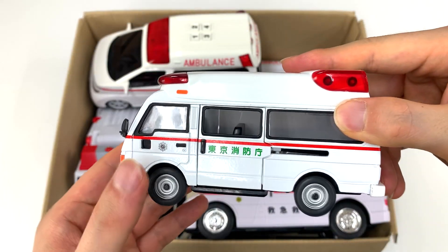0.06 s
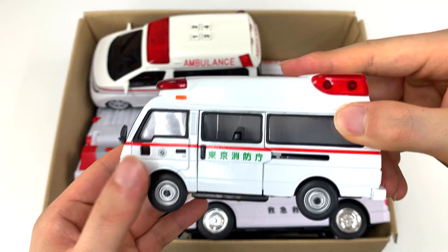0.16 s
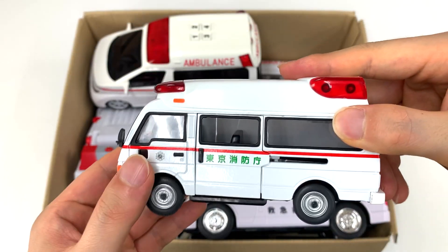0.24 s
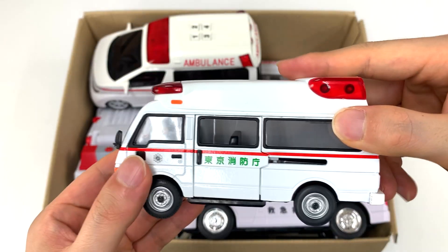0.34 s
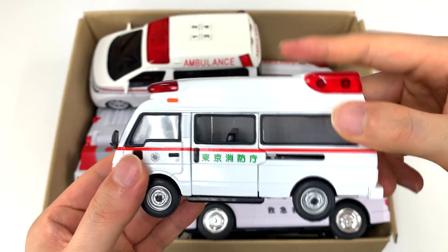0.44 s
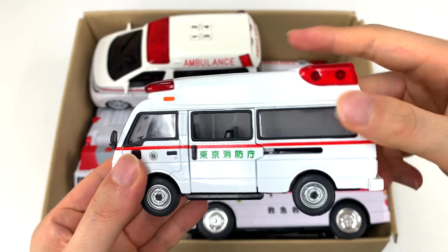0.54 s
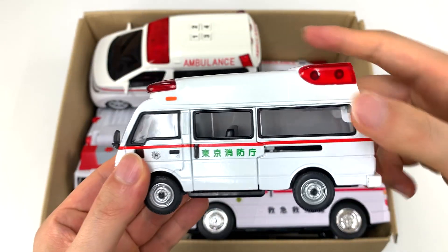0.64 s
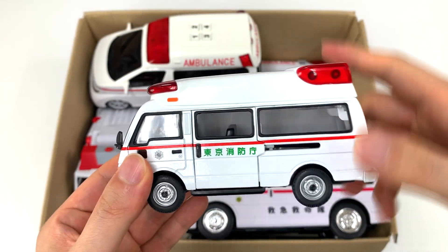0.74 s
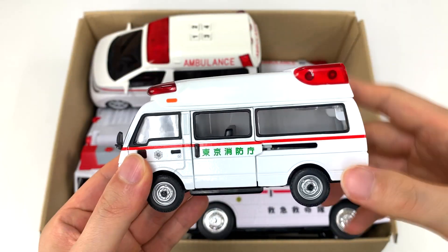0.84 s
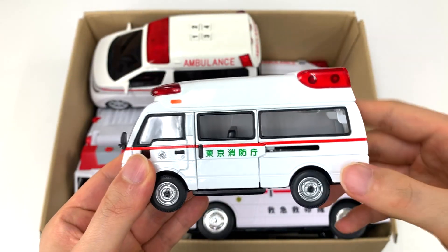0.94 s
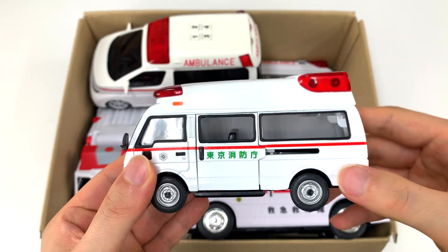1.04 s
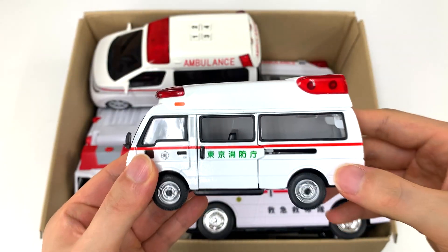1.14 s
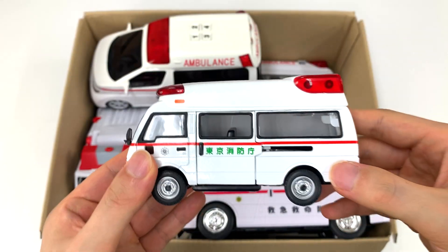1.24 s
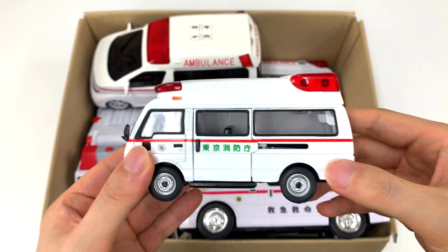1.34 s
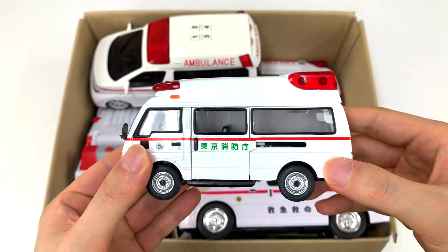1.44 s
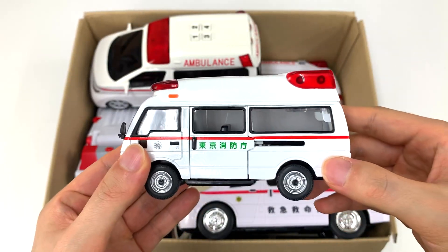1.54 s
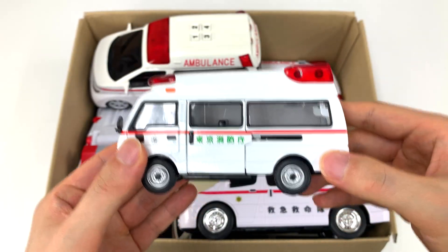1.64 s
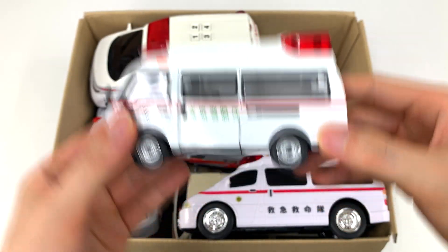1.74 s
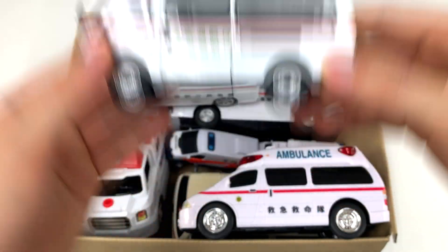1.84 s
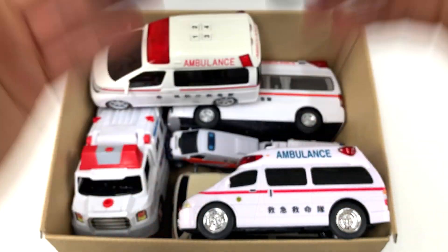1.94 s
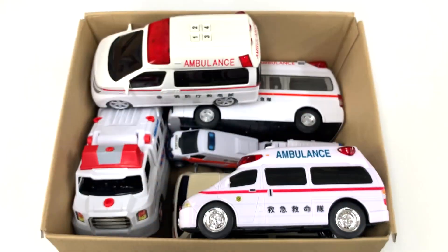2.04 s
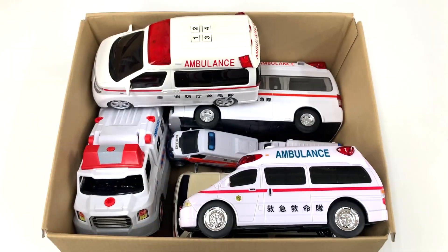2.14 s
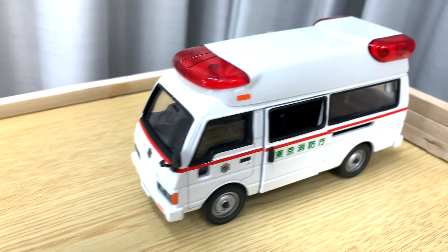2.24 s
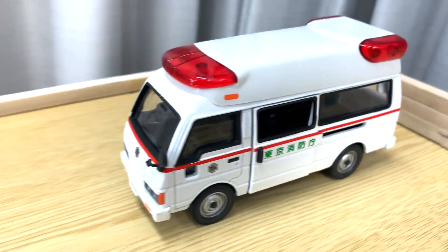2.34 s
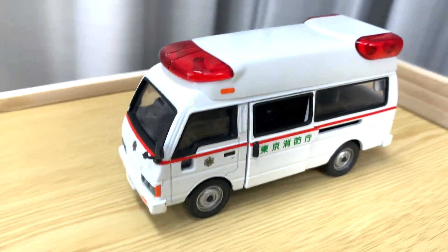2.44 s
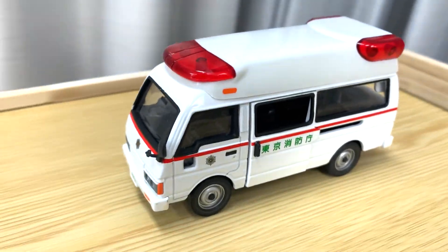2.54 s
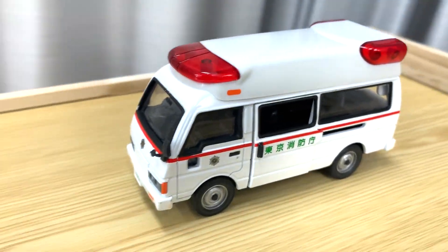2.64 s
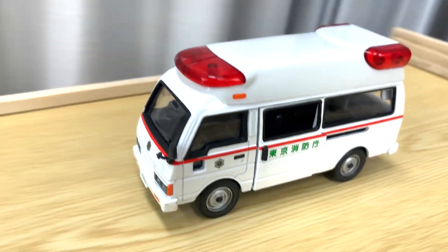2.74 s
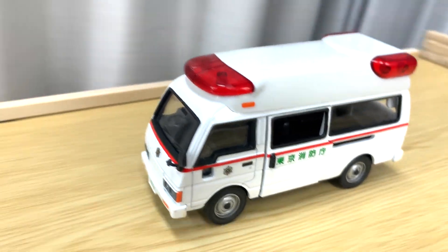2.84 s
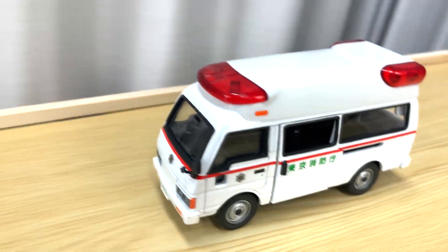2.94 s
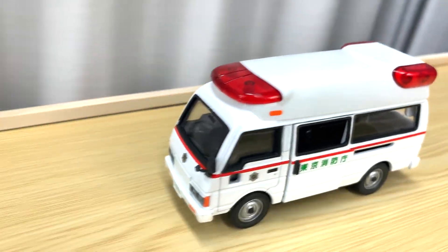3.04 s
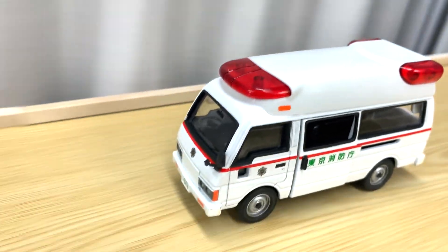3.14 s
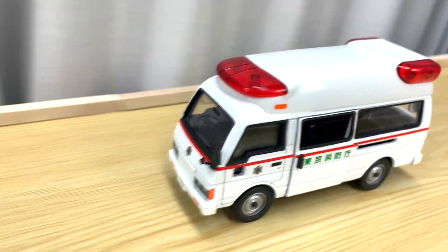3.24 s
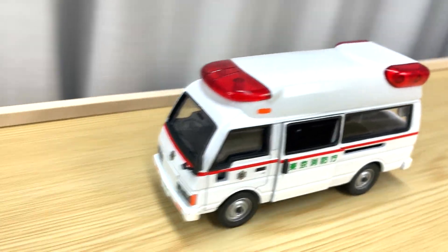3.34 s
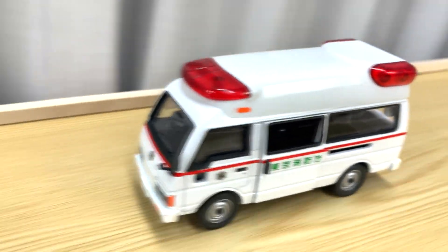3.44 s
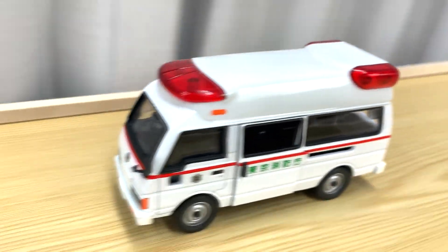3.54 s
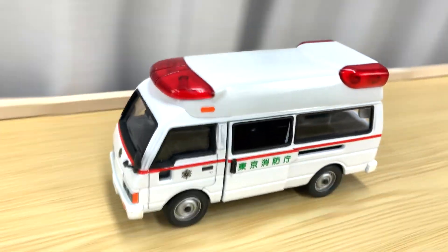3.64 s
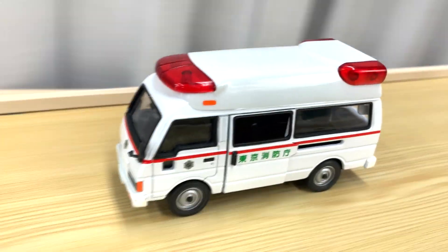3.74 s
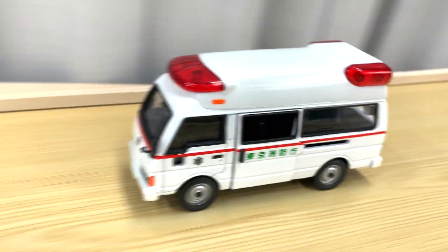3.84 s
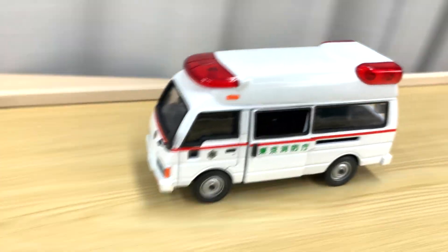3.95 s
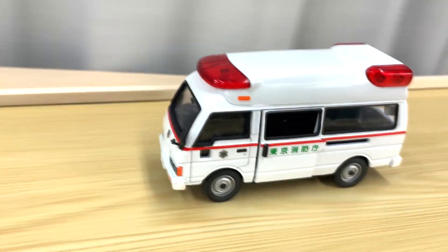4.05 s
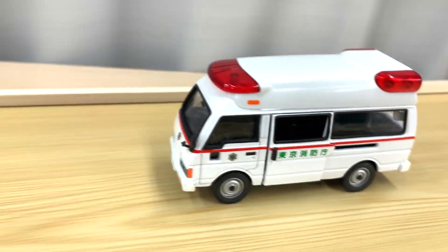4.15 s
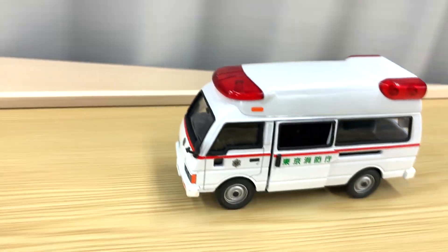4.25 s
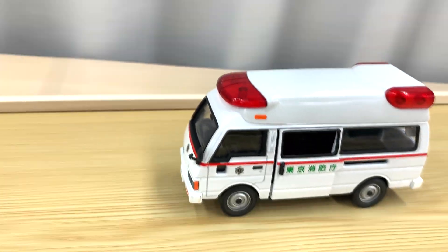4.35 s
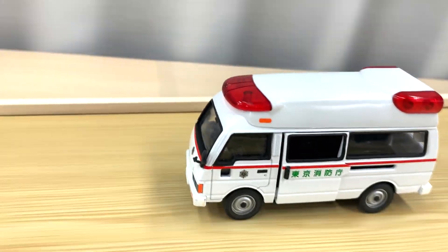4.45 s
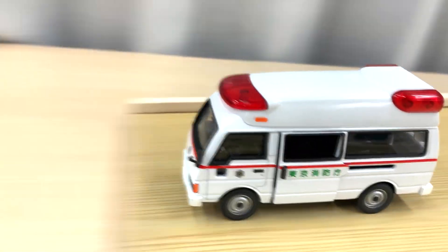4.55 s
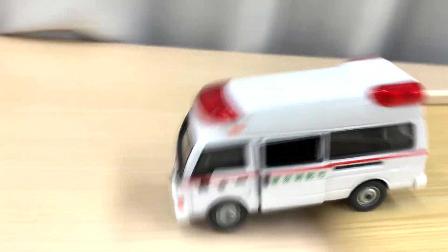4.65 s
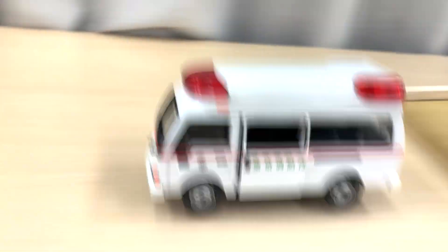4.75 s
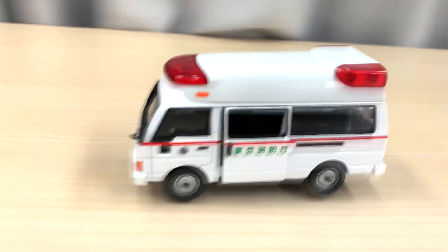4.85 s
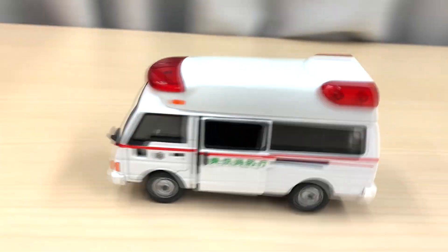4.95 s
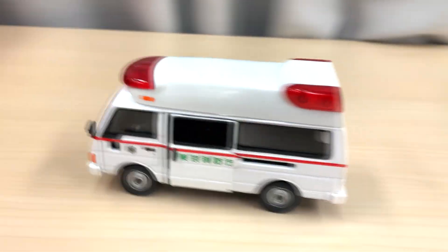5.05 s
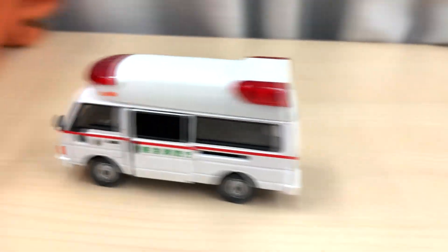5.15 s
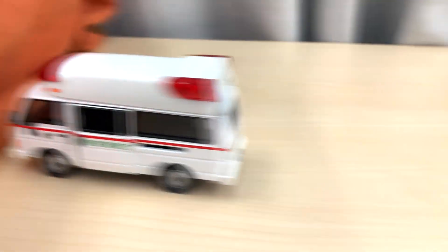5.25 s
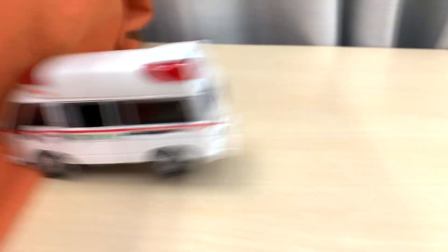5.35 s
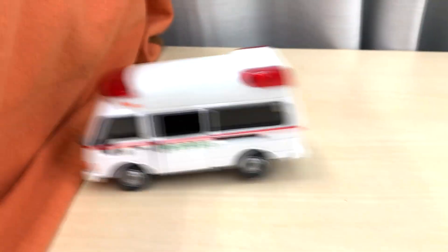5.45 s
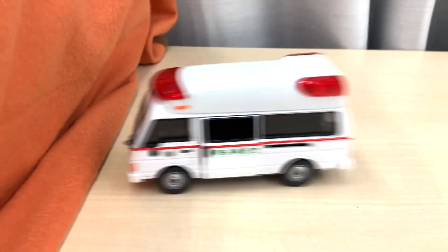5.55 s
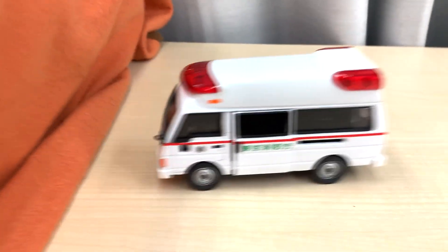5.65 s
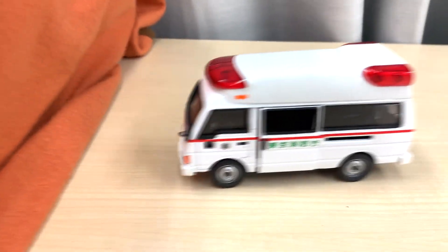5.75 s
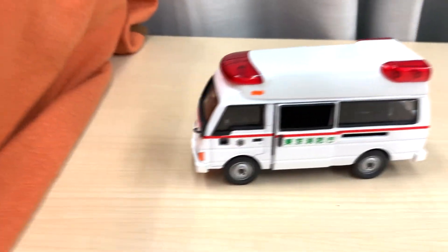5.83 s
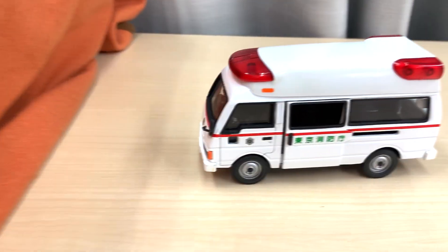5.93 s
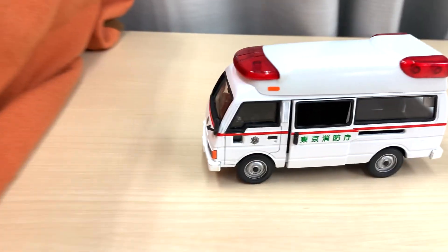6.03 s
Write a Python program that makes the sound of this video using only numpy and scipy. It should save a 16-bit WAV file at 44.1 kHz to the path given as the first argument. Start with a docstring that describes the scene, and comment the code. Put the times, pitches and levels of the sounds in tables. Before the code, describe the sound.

Quiet finger rubs and clicks, then a toy vehicle's wheels rumble and tick faster down plywood, land with clacks and a heavy thump, and fall silent.

```python
"""Toy van on a plywood ramp

A die-cast toy van is rubbed and clicked in the hands, then rolls down a plywood ramp, drops onto a table,
bumps a cushion, bounces and stops. Contact forces excite damped modes of the van, axles and plywood;
shaped noise gives the rumble and hollow bands, decaying sines the landings. Behind them lie room air,
mains hum and a far engine. Two ports on one small housing hear it, above a toy box, then beside the ramp.
"""
import sys
import numpy as np
from scipy import signal
from scipy.fft import rfft, irfft, next_fast_len
from scipy.io import wavfile
from scipy.ndimage import uniform_filter1d, map_coordinates

SR = 44100
rng = np.random.default_rng(int(sys.argv[2]) if len(sys.argv) > 2 else 0)


def transcribe(signal):
    """Save signal, clipped to [-1, 1], as a 16-bit WAV file at the path in sys.argv[1]."""
    frames = np.atleast_2d(signal).T
    limited = np.clip(frames, -1, 1)
    pcm = np.round(limited * 32767).astype(np.int16)
    wavfile.write(sys.argv[1], SR, pcm)


N = 268480  # length [samples]
RAMP_ENDS_S = 4.6


def rolling():
    """Superposition: contacts on ramp and table, axle pings, board sound and landings add linearly."""
    tick_rows = ticks()
    ramp_ticks = brightened([(*row, TICK_S, TICK_RISE) for row in tick_rows if row[0] < RAMP_ENDS_S],
                            at_db=-19.0, slope=0.57)
    table_ticks = brightened([(*row, TABLE_TICK_S, TICK_RISE) for row in tick_rows if row[0] > RAMP_ENDS_S],
                             at_db=-8.5, slope=0.45)
    t = np.arange(N) / SR
    on_ramp = np.clip((RAMP_ENDS_S - t) * 10 + .5, 0, 1)  # 0.1 s crossfade
    forces = rolling_forces()
    ramp = van(ramp_ticks, place=1, steady=[on_ramp * f for f in forces], span=(2.2, 4.8))
    table = van(clacks() + table_ticks, place=2, steady=[(1 - on_ramp) * f for f in forces], span=(4.5, N / SR))
    board = plywood_knocks() + board_rumble() + board_notes()
    hum_and_bands = tread_hum() + hollow_bands()
    return ramp + table + axle_pings(ramp_ticks, table_ticks) + board + hum_and_bands + landings()


# Rolling contact: (time [s], board rumble level [dB], tyre noise level [dB])
ROLL = [(2.27, -75, -101), (2.29, -49, -71.5), (2.7, -44.5, -62), (3.2, -39.5, -53.5), (3.7, -39, -49.5),
        (4.1, -41, -42), (4.35, -42, -45.5), (4.6, -36, -40.5), (4.9, -33.5, -43.5), (5.22, -40, -45.5),
        (5.4, -30, -38.5), (5.6, -28.5, -41), (5.63, -35, -54), (5.7, -44.5, -70), (5.93, -52.5, -76.5),
        (6.03, -49, -73), (6.09, -56.5, -76)]
ROLL_STARTS_S = ROLL[0][0]
# Middle and fine force levels at the reference tyre level; dB gained for each dB of tyre noise
TYRE_REFERENCE_DB = -46
MIDDLE_DB, MIDDLE_GROWS = -49.5, 1.3
FINE_DB, FINE_GROWS = -56, 2


def rolling_forces():
    """Rough-surface excitation: low, middle and high forces mix a steady part with small axle knocks."""
    _, tyre_db = curves(ROLL)
    knocks = jiggle(60, t60=.025, spread_db=4)
    over_db = tyre_db - TYRE_REFERENCE_DB
    tyre = amp(tyre_db + 2.6 * wobble(15))
    middle = amp(MIDDLE_DB + MIDDLE_GROWS * over_db)
    fine = amp(FINE_DB + FINE_GROWS * over_db)
    return tyre * (0.36 + 0.19 * knocks), middle * (0.78 + 0.8 * knocks), fine * (0.12 + 0.51 * knocks)


# Modes of the van: (frequency [Hz], width [Hz], level in the hands [dB], on the ramp [dB], on the table [dB])
VAN = [(394, 300, -30, -4, -8), (597, 330, -11.5, -1.5, -7.5), (806, 380, -9.5, -0.5, -4.5),
       (1060, 210, -0.5, -5.5, -8), (1366, 320, -4, 2, -2), (1962, 454, 0.5, 1.5, -1.5),
       (2480, 680, -6.5, -3.5, -8), (3175, 890, -3, -1.5, -4), (4930, 1440, -19.5, -12.5, -12),
       (6340, 1420, -4, -2.5, -6.5), (7530, 1600, -1, 3, -1), (8860, 4970, 2, 0.5, 1),
       (10050, 120, -37, -24.5, -16.5), (12600, 1600, -55, -7.5, -4.5), (12740, 6300, -23.5, -10.5, -4.5)]
LOW_HZ, HIGH_HZ = 2450, 5500  # borders of the low, middle and high mode groups


def van(events, place, steady, span):
    """Modal excitation: spiky contacts and steady forces ring every mode, each blow at a new strength.

    events: (time, force, low modes, high modes, contact length, rise as a share of the length)."""
    t = np.arange(SR // 16) / SR
    first, last = (round(edge * SR) for edge in span)
    s, db, low_db, high_db, length, rise = np.transpose(events)[..., None]
    draws = rng.standard_normal((len(s), 2 * len(t) + len(VAN)))
    noise, spikes, luck = np.split(draws, [len(t), 2 * len(t)], axis=1)
    onset = 1 - np.exp(-t / (rise * length))
    release = np.exp(-(t / length) ** 2) + 0.11 * np.exp(-t / (2.7 * length))
    chatter = unit(noise * amp(3 * spikes)) * onset * release
    where = ((s * SR).astype(int) - first + np.arange(len(t))).ravel()
    out, grain = np.zeros(N), rng.standard_normal(N)
    for k, (hz, width, *strength_db) in enumerate(VAN):
        group = int(hz > LOW_HZ) + int(hz > HIGH_HZ)
        size = amp(db + (low_db, 0, high_db)[group] + 2.4 * luck[:, [k]])
        blows = np.bincount(where, (size * chatter).ravel(), N)[:N][:last - first]
        rolling_force = (steady[group] * grain * amp(2.8 * wobble(22)))[first:last]
        sign = (-1) ** k  # neighbouring modes alternate in polarity
        out[first:last] += sign * amp(strength_db[place]) * ring(blows + rolling_force, hz, width)
    return out


# Bursts of axle ticks, about two a wheel turn:
# (first tick time [s], last tick time [s], first force [dB], last force [dB], low modes relative level [dB])
RATTLES = [(2.396, 2.436, -60.5, -56, 1.5), (2.5865, 2.642, -45, -48.5, -5.5),
           (2.762, 2.806, -43, -45.5, -6), (2.8793, 2.9268, -49, -49, -2),
           (3.0288, 3.0539, -43.5, -42.5, -3), (3.1398, 3.1775, -38.5, -46.5, -5),
           (3.243, 3.28, -42, -42, -3.5), (3.3251, 3.372, -45, -56.5, -3.5), (3.41, 3.448, -42, -43.5, -2),
           (3.514, 3.5426, -32.5, -41, -3), (3.5953, 3.618, -46.5, -47, 4),
           (3.671, 3.724, -32, -37.5, -5.5), (3.745, 3.7458, -34, -37.5, -5),
           (3.7825, 3.818, -47.5, -35.5, -8), (3.848, 3.8857, -47, -33, -5.5),
           (3.9239, 3.9562, -34, -30, -3.5), (3.979, 3.9953, -32, -37.5, -21),
           (4.0151, 4.0267, -28.5, -35, -2), (4.072, 4.087, -39, -31.5, -21),
           (4.11, 4.147, -29.5, -29.5, -5), (4.2095, 4.2344, -28, -25.5, -4.5),
           (4.2548, 4.2885, -32.5, -36, -4.5), (4.308, 4.336, -42, -35, -11.5),
           (4.389, 4.423, -33, -36.5, -23), (4.445, 4.479, -33.5, -36, -18.5),
           (4.52, 4.554, -36, -34.5, -14.5), (4.868, 4.8877, -22.5, -20.5, -10),
           (4.921, 4.935, -26.5, -25.5, -12), (4.9658, 4.981, -28, -23.5, -9.5),
           (5.009, 5.029, -27.5, -22, -14), (5.055, 5.067, -30, -30.5, -11.5),
           (5.127, 5.189, -25.5, -27.5, -12.5), (5.2555, 5.28, -28, -29, -12),
           (5.297, 5.316, -30.5, -32.5, -20)]
TICK_GAP_S, TICK_STRAY_S = .021, 0.0031  # nominal gap; random shift inside a burst
BETWEEN_DB, TICK_SCATTER_DB = -4, 2.5  # inner ticks against the ends; their spread
TICK_S, TABLE_TICK_S = 0.0049, 0.0072  # contact length on ramp and table
TICK_RISE = 0.31  # rise as a share of the contact, also in the hands


def ticks():
    """Intermittent contact: (time, force, low modes) rows fill each burst unevenly, weaker inside."""
    rows = []
    for first, last, first_db, last_db, low_db in RATTLES:
        u = np.linspace(0, 1, round((last - first) / TICK_GAP_S + .2) + 1)
        inside = (u > 0) & (u < 1)
        stray, size = rng.standard_normal((len(u), 2)).T
        when = first + u * (last - first) + inside * TICK_STRAY_S * stray
        db = first_db + u * (last_db - first_db) + inside * (BETWEEN_DB + TICK_SCATTER_DB * size)
        rows += zip(when, db, low_db + 0 * u)
    return rows


def brightened(events, at_db, slope):
    """Nonlinear contact: harder blows reach further into the high modes."""
    return [(s, db, low_db, slope * (db - at_db), *rest) for s, db, low_db, *rest in events]


# Body clattering on the table: (time [s], force [dB], high modes relative level [dB],
# contact length [s], rise [share of the length])
CLACKS = [(4.593, -30, -10, 0.025, 0.26), (4.618, -18, -5.5, 0.0094, 0.29),
          (4.664, -27.5, -24, 0.015, 0.27), (4.675, -8.5, -8.5, 0.0053, 0.34),
          (4.7441, -14, -9.5, 0.0047, 0.074), (4.7556, -15.5, -7.5, 0.0088, 0.19),
          (4.8202, -22, -3.5, 0.0092, 0.13), (4.8265, -13.5, -3, 0.0046, 0.2),
          (5.325, -13, -4, 0.017, 0.93), (5.334, -15, -2, 0.0098, 0.55), (5.386, -32.5, -21, 0.0028, .1),
          (5.4278, -16, -3.5, 0.011, 0.11), (5.4413, -21.5, -7, 0.024, 0.35),
          (5.502, -16.5, -2, 0.0081, 0.071), (5.547, -19.5, -0.5, 0.0037, .08),
          (5.5775, -30, -8, 0.011, .08)]


def clacks():
    """Impact excitation: each clack drives the low modes 8.5 dB below the middle ones."""
    return [(s, db, -8.5, *rest) for s, db, *rest in CLACKS]


# Axle's short ping, on the ramp and on the table: (frequency [Hz], width [Hz], level over the tick [dB])
AXLE = [
    [(3548, 460, 16), (4967, 210, 7.5)],
    [(2640, 300, 22), (3090, 230, 22)],
]
# Clearest axle pings on the ramp: (time [s], strike level [dB])
PINGS = [(3.5458, -29.5), (3.8212, -31.5), (3.8563, -33.5), (3.9255, -26), (3.9579, -29), (3.9974, -23),
         (4.0741, -27), (4.1109, -27), (4.128, -21.5), (4.1704, -29), (4.2906, -28.5), (4.3234, -28),
         (4.337, -26), (4.3884, -30), (4.4817, -33), (4.5206, -28), (4.5391, -23.5)]
PING_LATE_S = 0.0028  # delay after the tick
PING_GROWS_S, PING_BEFORE_DB = 5.1, -10  # table pings are weaker before this moment


def axle_pings(ramp_ticks, table_ticks):
    """Impulse response: each tick also strikes narrow axle modes a moment later."""
    on_ramp = pings(ramp_ticks, AXLE[0], 4, PING_LATE_S)
    hz, width, _ = AXLE[0][0]
    clear = pings(PINGS, [(hz, width, 16)], scatter_db=-3)
    on_table = pings(table_ticks, AXLE[1], 2.5, PING_LATE_S)
    weaker_first = amp(PING_BEFORE_DB * (np.arange(N) / SR < PING_GROWS_S))
    return on_ramp + clear + on_table * weaker_first


# Dull knocks of the wheels on the plywood: (time [s], strike level [dB])
KNOCKS = [(3.029, -31), (3.338, -28.5), (3.427, -27), (3.512, -31), (3.596, -22), (3.967, -34)]
# Modes of the plywood: (frequency [Hz], width [Hz], level over the strike [dB])
PLY = [(400, 110, 7.5), (600.3, 60, 11.5), (847, 125, 9.5), (1148.5, 130, 9)]


def plywood_knocks():
    """Plate modes: wheel knocks and a random patter strike the plywood's resonances."""
    _, tyre_db = curves(ROLL)
    patter_db = np.where(np.arange(N) / SR < RAMP_ENDS_S, tyre_db + 12, -150)
    small = patter(patter_db, per_second=120, spread_db=13)
    return pings([*KNOCKS, *small], PLY, scatter_db=2.5)


def patter(level_db, per_second, spread_db):
    """Random point process: (time, level) rows of small knocks lie at or below a level curve."""
    when, size = rng.random((round(per_second * N / SR), 2)).T
    return np.c_[when * N / SR, level_db[(when * N).astype(int)] - spread_db * size]


# Rumble spectrum of the board: (frequency [Hz], spectral level [dB])
BOARD = [(25, -42), (49, 1.5), (96, -2), (150, -4.5), (184, -18.5), (296, -19.5), (430, -55), (730, -120)]


def board_rumble():
    """Broadband plate radiation: low coloured noise wavers and follows the rumble level."""
    rumble_db, _ = curves(ROLL)
    return amp(rumble_db) * unit(hiss(BOARD) * amp(2.8 * wobble(7.2)))


# Two swells of the board's own note: (start [s], peak [s], end [s], peak level [dB], frequency [Hz])
BOARD_NOTE = [(3.967, 4.119, 4.51, -31.5, 133.9), (5.411, 5.535, 5.706, -23, 131.4)]


def board_notes():
    """Resonance: the board's own note swells and fades as an unsteady sine."""
    notes = 0
    for start, peak, end, db, hz in BOARD_NOTE:
        swell, = curves([(start, db - 16), (peak, db), (end, db - 22)])
        notes = notes + tone(hz, swell, waver_db=1.6)
    return notes


# Hum of the tread ripples: (time [s], level [dB])
OUT_OF_ROUND = [(3.2, -40.5), (3.788, -36.5), (3.9, -66.5)]
TURNS_PER_S, AT_S, SPEEDS_UP = 6.25, 3.6, 2.2  # wheel speed at AT_S [s]; turns/s gained each second
RIPPLES = 12  # per wheel turn


def tread_hum():
    """Periodic excitation: the hum's pitch is wheel speed times ripples per turn."""
    turns = TURNS_PER_S + SPEEDS_UP * (np.arange(N) / SR - AT_S)
    return tone(RIPPLES * turns, *curves(OUT_OF_ROUND), waver_db=1.5)


# Hollow bands under the wheels, on the ramp and then near the table: (time [s], level [dB], centre [Hz])
HOLLOW = [
    [(3.5, -58.5, 578.5), (4, -49.5, 641.5), (4.25, -43.5, 747.5), (4.31, -38, 720)],
    [(4.27, -81, 364), (4.33, -39.5, 361), (4.5, -60, 364), (5.05, -50, 398), (5.22, -39.5, 430),
     (5.55, -41.5, 421), (5.65, -49.5, 413)],
]


def hollow_bands():
    """Modulated narrowband noise: slow noise on two quadrature carriers makes a wandering band."""
    out = np.zeros(N)
    for rows in HOLLOW:
        db, hz = curves(rows)
        lowest_hz = min(row[2] for row in rows)
        centre = np.maximum(hz, lowest_hz) + 35 * wobble(15)
        phase = 2 * np.pi * np.cumsum(centre) / SR
        band = unit(wobble(130) * np.cos(phase) + wobble(130) * np.sin(phase))
        out += soft(db) * unit(amp(2.5 * wobble(30))) * band
    return out


# Wheels landing on wood: (time [s], swing level before damping [dB], ring frequency [Hz])
THUMPS = [(4.679, -10, 153.5), (4.764, -14.5, 155), (4.825, -13, 163), (4.887, -18.5, 104),
          (4.986, -16.5, 114.6), (5.036, -20, 102), (5.185, -17.5, 103), (5.3372, 17, 117),
          (5.436, -2, 121), (5.511, -9.5, 121), (5.551, -17, 133)]
THUMP_T60_S, DAMPING = 0.044, 0.33  # decay at 0 dB; harder landings damp the wood sooner
PRESS_S, PRESS_GROWS = 0.0034, 0.27  # onset at 0 dB; harder landings press longer


def landings():
    """Damped oscillation: each landing gives one low, short swing and a rough thud."""
    out, rough, t = np.zeros(N + SR), np.zeros(N + SR), np.arange(SR // 3) / SR
    for s, db, hz in THUMPS:
        press = (1 - np.exp(-t / (PRESS_S * amp(PRESS_GROWS * db)))) ** 2
        t60 = THUMP_T60_S * amp(-DAMPING * db)
        swing = amp(db - 60 * t / t60) * press * np.sin(2 * np.pi * hz * t)
        start = round(s * SR)
        out[start:][:len(t)] -= swing
        rough[start:][:len(t)] += amp(min(db, 0) - 17.5) * np.exp(-t / .02)
    return out[:N] + ring(rough[:N] * rng.standard_normal(N), hz=170, width=150)


def hands():
    """Superposition: finger friction, clicks of loose parts and nail taps add."""
    rub = rub_level()
    return handling_clicks(rub) + nail_taps() + rubbing(rub)


# Fingers sliding on the body: (time [s], reference level [dB])
RUB = [(0.0, -47.5), (0.255, -51.5), (0.33, -57), (0.5, -79)]


def rub_level():
    """Friction: the slide's amplitude follows its level curve and flutters."""
    return amp(curves(RUB)[0] + 2.0 * wobble(44.5))


# Friction spectrum of the skin: (frequency [Hz], spectral level [dB])
SKIN = [(210, -45), (350, -25.5), (885, -7), (1940, -21), (2550, -6.5), (2800, -45), (6000, -43),
        (13200, -120)]
# Thin tones within the rubbing: (frequency [Hz], relative level [dB])
STRANDS = [(888, -1.5), (1050, -1), (1470, -5), (1900, -6)]


def rubbing(rub):
    """Friction noise: sliding gives coloured hiss threaded with narrow resonances."""
    strands = sum(amp(db) * ring(rng.standard_normal(N), hz, width=17) for hz, db in STRANDS)
    return rub * (amp(-10.5) * hiss(SKIN) + amp(-15.5) * strands)


# Clicks of loose parts: (time [s], force [dB], low modes relative level [dB], high modes relative level [dB])
HANDLING = [(0.2631, -39.5, 0, -9), (0.269, -44.5, 0, -25), (0.313, -55, -6, -27), (0.41, -59, -6.5, -3),
            (0.615, -65, -6, -5), (0.944, -52, -4.5, -20), (0.97, -71, 14, -19), (1.793, -74.5, 7, -20),
            (1.864, -66, 10, -20), (1.876, -52, 1.5, -15), (1.935, -55, -3.5, -20),
            (1.966, -62.5, 4.5, -16), (2.003, -59, 0, -28), (2.0187, -44.5, -7.5, -9),
            (2.0255, -43.5, -13, -4.5), (2.058, -53, -2, -31), (2.145, -45, -7, -26),
            (2.183, -56.5, 0.5, -31)]


def handling_clicks(rub):
    """Modal excitation: clicks ring the held van while rubbing stirs its low and middle modes."""
    stir = amp(-18.5) * rub, amp(-27.5) * rub, 0 * rub
    clicks = [(*row, 0.0077, TICK_RISE) for row in HANDLING]  # contact length [s], rise [share]
    return van(clicks, place=0, steady=stir, span=(0, 2.4))


# Nail taps: (time [s], strike level [dB])
TAPS = [(.542, -76), (.618, -64)]
# Mode of the tapped panel: (frequency [Hz], width [Hz], level over the strike [dB])
SHELL = [(2060, 130, 22.5)]


def nail_taps():
    """Impulse response: light taps ring one narrow panel mode."""
    return pings(TAPS, SHELL, scatter_db=-2.5)


# Swell of the room's bass and hum at first: (time [s], gain [dB])
SETTLE = [(0, -10.5), (.8, -0.5)]


def background():
    """Superposition: room air, mains hum and a far engine lie under the events."""
    t = np.arange(N) / SR
    bass, rest = room_air()
    swell = amp(np.interp(t, *np.transpose(SETTLE)))
    wider = amp(2.1 * (t > ROLL_STARTS_S))  # beside the ramp the air hisses a little louder
    return swell * (bass + mains_hum()) + wider * rest + far_engine()


# Room air spectrum: (frequency [Hz], spectral level [dB])
AIR = [(25, -13), (68, -6.5), (206, -24), (405, -34), (1260, -45.5), (7110, -56), (9570, -48.5),
       (11800, -63.5), (13500, -54.5), (16000, -85.5)]


def room_air():
    """Spatial coherence: bass is shared by the ports, higher noise is independent at each."""
    shared, own = rng.standard_normal(N), rng.standard_normal((2, N))

    def turn(hz):
        return np.pi / 2 * hz / (hz + 350)

    bass = filtered(shared, lambda hz: amp(along(AIR, hz)) * np.cos(turn(hz)))
    rest = filtered(own, lambda hz: amp(along(AIR, hz)) * np.sin(turn(hz)))
    gain = amp(-60.5) / np.std(bass + rest)
    return gain * bass, gain * rest


# Mains hum before the bass swell: (frequency [Hz], peak level [dB])
MAINS = [(120, -63)]


def mains_hum():
    """Periodic source: a sine at the hum frequency wavers slowly in level."""
    t = np.arange(N) / SR
    return sum(amp(db + 1.0 * wobble(4.0)) * np.sin(2 * np.pi * hz * t) for hz, db in MAINS)


# Far engine: (time [s], level [dB])
DRONE = [(0, -65), (.6, -66.5), (.85, -53), (1.3, -49), (1.45, -55), (1.75, -48.5), (2.03, -48.5),
         (2.12, -70), (2.3, -102)]


def far_engine():
    """Periodic source: a low sine starts at 46.3 Hz and rises 6.8 Hz each second."""
    return tone(46.3 + 6.8 * np.arange(N) / SR, *curves(DRONE), waver_db=.7)


# Reverberation: (frequency [Hz], t60 [s])
ROOM = [(300, 0.15), (2000, 0.115)]


def room(x, top_hz):
    """Diffuse reverberation: two unlike noise tails decay at a frequency-dependent rate."""
    hz, t, z = signal.stft(rng.standard_normal((2, SR // 2)), SR, nperseg=256)
    band = ((hz > 250) / (1 + (hz / top_hz) ** 4))[:, None]
    decay = amp(-60 * t / along(ROOM, hz)[:, None])
    tail = signal.istft(z * decay * band, SR, nperseg=256)[1]
    delayed = np.pad(x, (300, 0))[None]
    return signal.fftconvolve(delayed, tail / np.linalg.norm(tail[0]), axes=1)[:, :N]


def nearby(x, t60, count):
    """Early reflections: short tails differ at each port and take turns every 0.1 s."""
    t, place = np.arange(SR // 20) / SR, np.arange(N) // (SR // 10) % count
    tails = rng.standard_normal((count, 2, len(t))) * amp(-60 * t / t60)
    wet = 0
    for k, tail in enumerate(tails):
        wet = wet + signal.oaconvolve((x * (place == k))[None], tail / np.linalg.norm(tail[0]), axes=1)
    return filtered(wet[:, :N], lambda hz: hz ** 2 / np.hypot(hz ** 2, 400 ** 2))


# Phase lead of the left port: (frequency [Hz], above the box [rad], beside the ramp [rad])
LEAD = [(0, 0, -6.28), (90, 0, -5.95), (215, 0, -4.5), (350, 0, -2), (450, .4, 0), (700, .8, 1.3),
        (1100, .7, 1.3), (1950, 0, .3), (2700, 2.8, 4.3), (3600, 1.5, 1.2), (4900, 0, 0),
        (6800, -3.1, -3.1), (16400, -15.7, -15.7)]
# Balance of the ports: (frequency [Hz], left minus right [dB])
BALANCE_DB = [(400, -0.5), (750, 3.5), (1300, 0), (2400, -4), (5000, 0)]


def ports(x, lead):
    """Diffraction: the housing gives the two ports different phase and level."""
    side = np.array([[.5], [-.5]])
    points = np.transpose(LEAD)[0]
    return filtered(x, lambda hz: amp(side * along(BALANCE_DB, hz)) * np.exp(1j * side * np.interp(hz, points, lead)))


def amp(db):
    """Level: decibels become an amplitude ratio."""
    return 10 ** (np.asarray(db) / 20)


def unit(x):
    """Normalisation: scale to rms 1."""
    return x / np.sqrt(np.mean(x ** 2) + 1e-20)


def along(points, hz):
    """Logarithmic frequency: interpolate (frequency, value) points on a log axis."""
    f, v = np.transpose(points)
    return np.interp(np.log(hz + 1), np.log(f + 1), v)


def curves(rows):
    """Interpolation: one value per sample for each column, -150 outside the table."""
    s, *cols = np.transpose(rows)
    return [np.interp(np.arange(N) / SR, s, c, -150, -150) for c in cols]


def soft(db):
    """Smoothing: gain of a level curve averaged over 20 ms."""
    return uniform_filter1d(amp(db), size=SR // 50)


def wobble(rate):
    """Band-limited fluctuation: a smooth random curve with rate knots a second."""
    return map_coordinates(rng.standard_normal(int(N * rate / SR) + 4), [np.arange(N) * rate / SR])


def filtered(x, response):
    """Linear filtering: multiply the spectrum by a complex response of frequency."""
    m = next_fast_len(N + SR // 2)
    return irfft(rfft(x, m) * response(np.fft.rfftfreq(m, 1 / SR)), m)[..., :N]


def hiss(spectrum):
    """Spectral shaping: coloured noise of rms 1."""
    return unit(filtered(rng.standard_normal(N), lambda hz: amp(along(spectrum, hz))))


def tone(hz, db, waver_db):
    """Phase accumulation: an unsteady sine follows pitch and level curves."""
    phase = 2 * np.pi * np.cumsum(hz * np.ones(N)) / SR
    return np.sqrt(2) * soft(db) * amp(waver_db * wobble(25)) * np.sin(phase)


def ring(force, hz, width):
    """Resonance: two cascaded peaks form one damped mode; white noise keeps about its rms."""
    b, a = signal.iirpeak(hz, hz / width, SR)
    return np.sqrt(2 * SR / (np.pi * width)) * signal.lfilter(b, a, signal.lfilter(b, a, force))


def jiggle(per_second, t60, spread_db):
    """Intermittent contact: decaying knocks at an almost even pace form an envelope of rms 1."""
    knocks, count = np.zeros(N), int(N * per_second / SR)
    late, size = rng.standard_normal((count, 2)).T
    where = (np.arange(count) + .35 * late) * SR / per_second
    knocks[np.clip(where, 0, N - 1).astype(int)] = amp(spread_db * size)
    return unit(signal.lfilter([1], [1, -amp(-60 / (t60 * SR))], knocks))


def pings(events, modes, scatter_db, late_s=0):
    """Impulse response: clean strikes ring a few modes, each at a new strength."""
    s, db = np.transpose(events)[:2]
    where = ((s + late_s) * SR).astype(int)
    out = np.zeros(N)
    for hz, width, over_db in modes:
        luck = rng.standard_normal(len(s))
        strikes = np.bincount(where, amp(db + scatter_db * luck), N)[:N]
        out += amp(over_db) * ring(strikes, hz, width)
    return out


def scene():
    """Sound field: direct sound, near reflections, reverberation and background add at both ports."""
    _, above, beside = np.transpose(LEAD)
    held, rolled = hands(), rolling()
    # one shared echo passes through the ports like the van itself
    echoes = room(amp(-14.5) * held + amp(-28.0) * rolled, top_hz=14700)[0]
    first = np.arange(N) / SR < ROLL_STARTS_S
    direct = ports(held + first * echoes, above) + ports(rolled + ~first * echoes, beside)
    close = nearby(amp(-9.0) * (held + rolled), t60=0.025, count=6)
    far = room(amp(-11.5) * held + amp(-17.0) * rolled, top_hz=10860)
    return direct + close + far + background()


def record(dry):
    """Band limitation: deep bass and treble roll off, and nothing stays from 16.8 kHz up."""

    def response(hz):
        bass_cut = hz ** 2 / np.hypot(hz ** 2, 35 ** 2)
        treble_cut = 1 / np.sqrt(1 + (hz / 15200) ** 60)
        return (hz < 16800) * bass_cut * treble_cut

    return filtered(dry, response)


dry = scene()
out = record(dry)
transcribe(out)
```